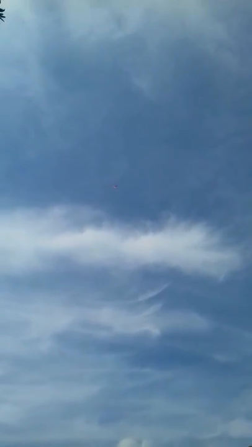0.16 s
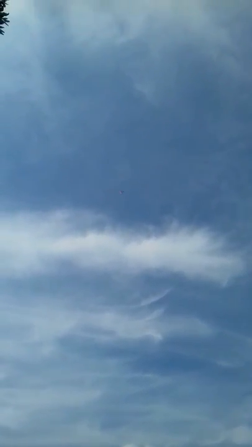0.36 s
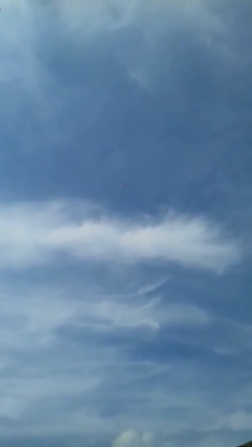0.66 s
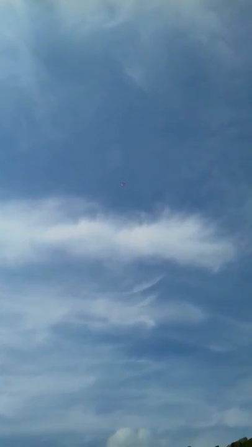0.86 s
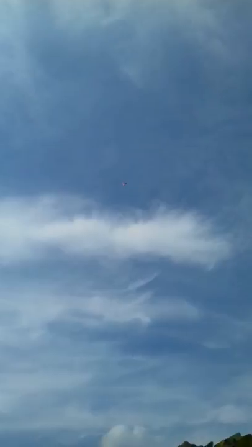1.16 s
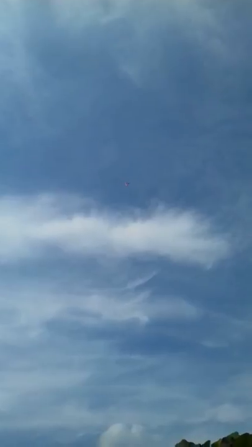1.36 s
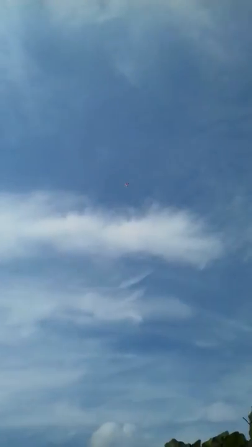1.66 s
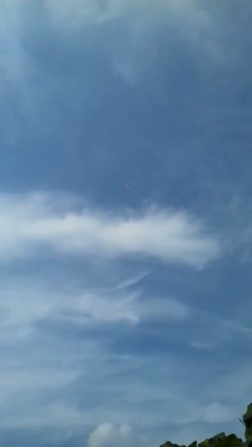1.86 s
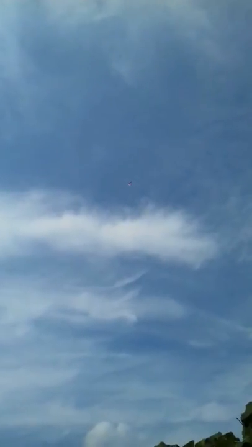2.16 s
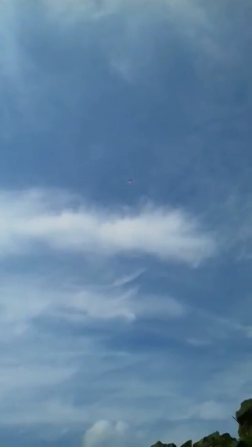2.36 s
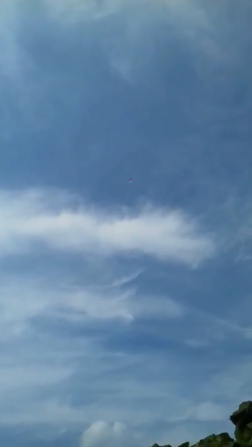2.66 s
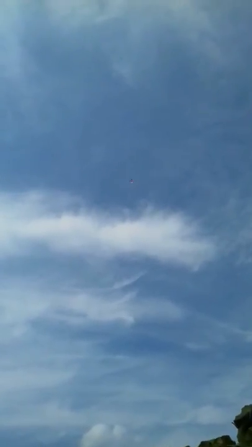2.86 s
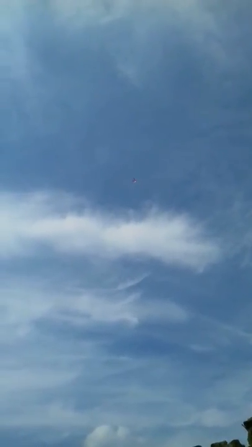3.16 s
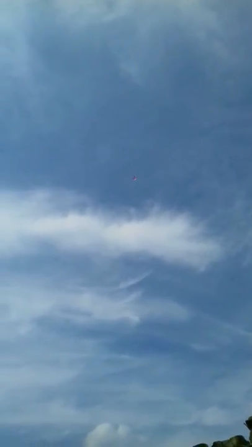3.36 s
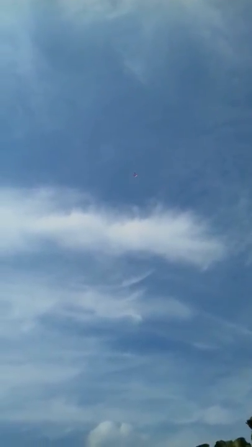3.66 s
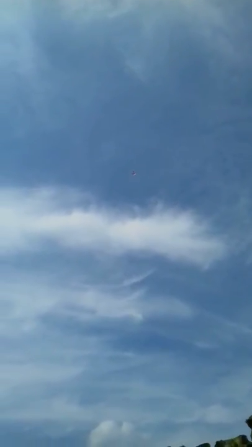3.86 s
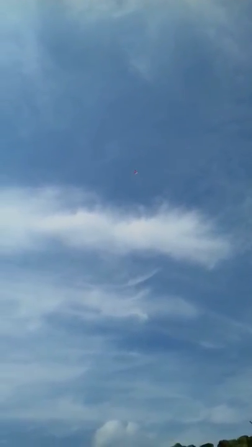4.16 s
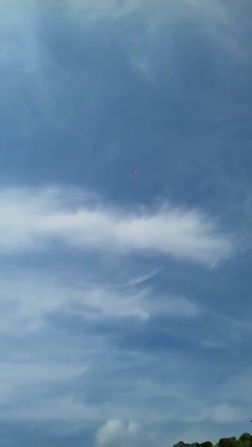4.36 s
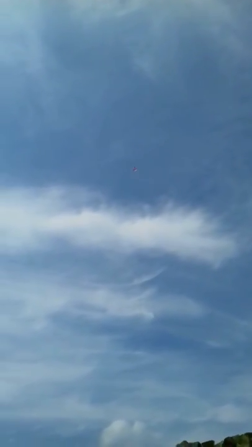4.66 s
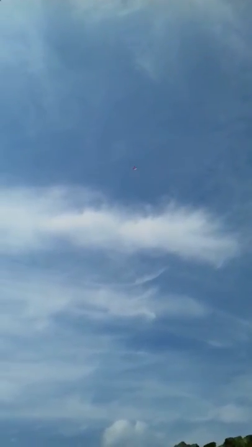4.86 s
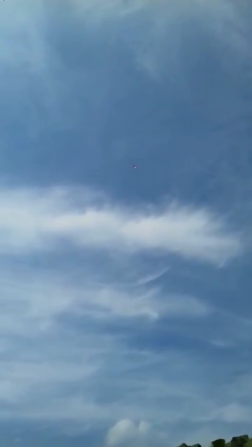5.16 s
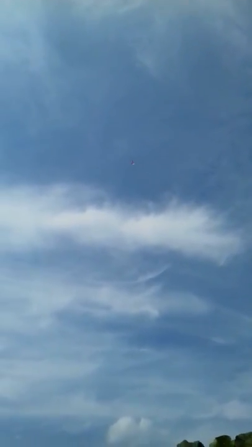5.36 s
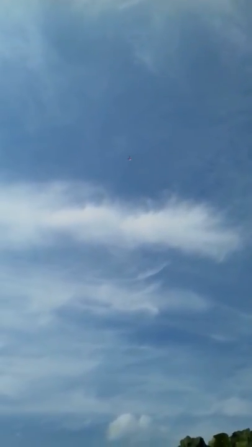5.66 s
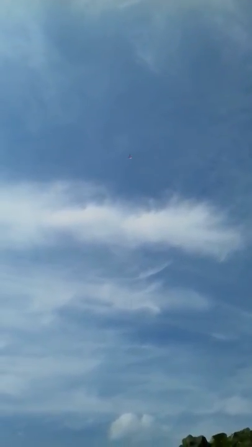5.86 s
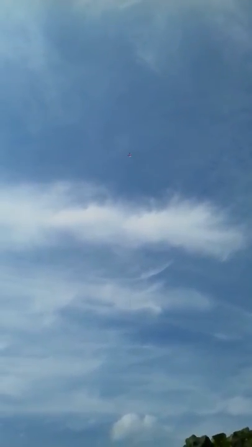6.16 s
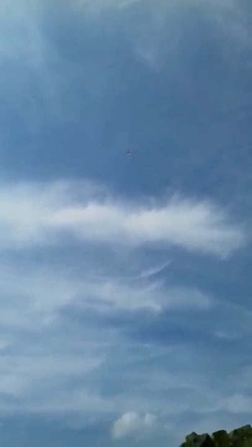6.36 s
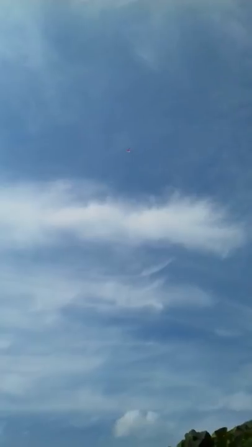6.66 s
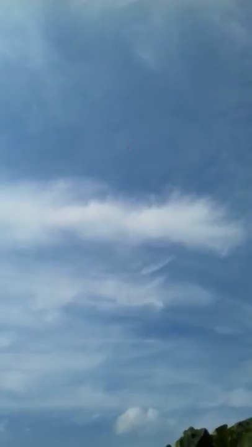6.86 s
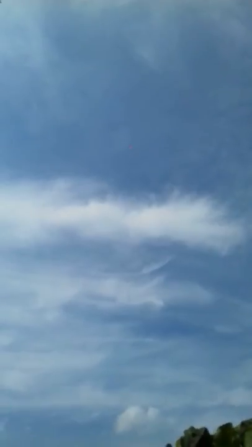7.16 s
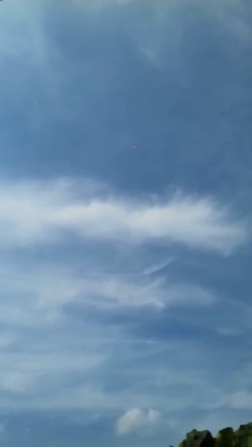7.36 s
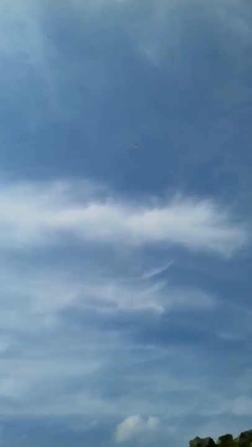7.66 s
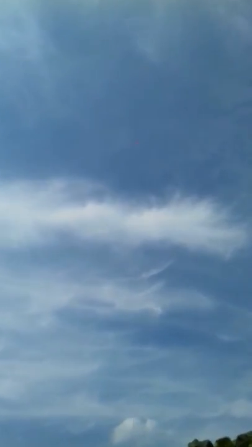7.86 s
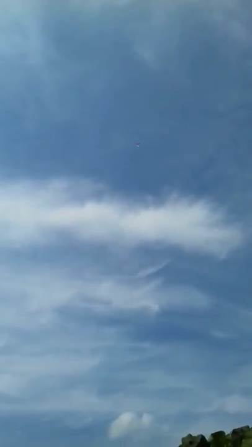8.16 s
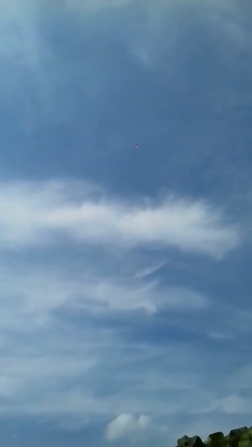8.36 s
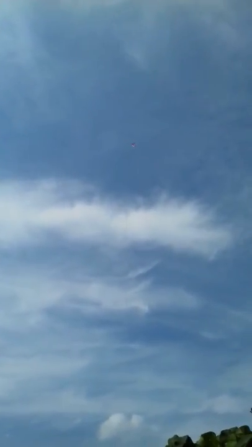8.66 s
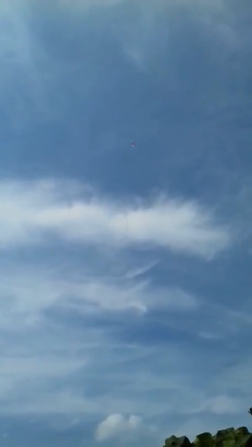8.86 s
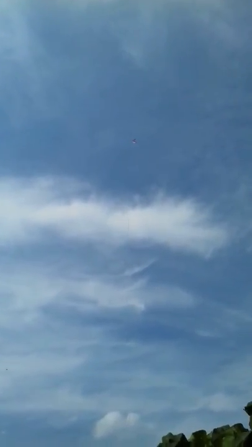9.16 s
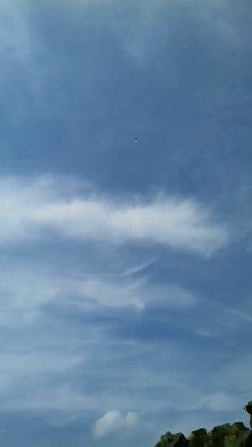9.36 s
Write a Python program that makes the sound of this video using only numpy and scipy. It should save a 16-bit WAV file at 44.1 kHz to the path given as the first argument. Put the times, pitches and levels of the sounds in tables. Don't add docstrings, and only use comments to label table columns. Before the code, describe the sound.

Throughout about 9.5 seconds, a kite hums high overhead: a thin, nasal buzz centred around 630 to 700 Hz, throbbing roughly nine times a second with a slight pitch wobble. From 1 to 1.8 s gusts make the bow sing out higher, near 840 Hz; the hum dips at 2.1 s, returns, and sings again near 2.5, 3.6 and 4.5 to 5.2 s. It drops briefly near 5.4 s, then from 6 to 7 s becomes almost steady before throbbing again, swelling at the end. Leaves hiss softly with dry ticks, sharpest at 1.87 and 4.08 s. Birds chirp briefly at 0.2, 0.7, 3.3, 3.6, 5, 6, 7.4, 7.9, 8.2 and 8.7 s. A faint far whine rises until 1.5 s and returns around 3 s; a low drone swells faintly. Small wind bumps occur at 4.5 and 9.1 to 9.3 s, over steady microphone hiss.

```python
import sys
import numpy as np
from scipy import signal
from scipy.fft import rfft, irfft, next_fast_len
from scipy.io import wavfile

SR = 44100
rng = np.random.default_rng(int(sys.argv[2]) if len(sys.argv) > 2 else 0)


def invert_db(x):
    u = np.asarray(x, float) / 20
    return 10 ** u


def transcribe(u):
    v = np.clip(np.atleast_2d(u).T, -1, 1)
    q = np.round(v * 32767).astype(np.int16)
    wavfile.write(sys.argv[1], SR, q)


N = 419082


def unit(x):
    return x / np.sqrt(np.mean(x ** 2) + 1e-20)


def in_time(rows):
    s, *columns = np.transpose(rows)
    return [np.interp(np.arange(N) / SR, s, column) for column in columns]


def drift(rate):
    r = np.exp(-80 * np.pi * rate / SR)
    slow = signal.lfilter([1], [1, -2 * r, r * r], rng.standard_normal(N // 40 + 2002))[2000:]
    return np.interp(np.arange(N) / 40, np.arange(len(slow)), unit(slow))


def resonance(x, hz, width_hz):
    r = np.exp(-np.pi * width_hz / SR)
    ring = [1, -2 * r * np.cos(2 * np.pi * hz / SR), r * r]
    return signal.lfilter([(1 - r * r) / 2, 0, (r * r - 1) / 2], ring, x)


def coloured(spectrum, patchy_db):
    size = next_fast_len(N)
    hz_at, db_at = np.transpose(spectrum)
    octave = np.log2(np.arange(size // 2 + 1) * SR / size + 1)
    curve_db = np.interp(octave, np.log2(hz_at), db_at, -120, -120)
    shaped = rfft(rng.standard_normal(size)) * invert_db(curve_db)
    if not patchy_db:
        return unit(irfft(shaped, size)[:N])
    out = 0
    together = drift(16.4)
    for centre in range(int(np.log2(hz_at[0])), 15):
        share = np.clip(1 - np.abs(octave - centre), 0, 1)
        flicker_db = patchy_db * (0.74 * together + drift(47))
        out = out + irfft(shaped * share, size)[:N] * invert_db(flicker_db)
    return unit(out)


def sine(turns):
    return np.sqrt(2) * np.sin(2 * np.pi * turns)


def kite():
    # time in seconds, hum level in dB, rocking from 0 to 1,
    # ribbon tautness as the centre of its tone in Hz.
    flight = [(0, -54.5, 0.99, 650), (.5, -58.5, 0.84, 645), (1.75, -50, 0.92, 635),
              (2.12, -66.5, 0.79, 570), (2.36, -52, 0.86, 653), (3.1, -58.5, 0.59, 630),
              (3.36, -54, 0.66, 651.4), (4.4, -57, 0.8, 657), (4.55, -57, .75, 662),
              (5.17, -55.5, 0.78, 640), (5.37, -68, 0.9, 650), (5.5, -56.5, 0.73, 641),
              (5.95, -53.5, 0.11, 656.4), (7.07, -53, .25, 656), (7.35, -57.5, 0.83, 640),
              (8.2, -55.5, .7, 707), (8.68, -64, .6, 660), (9.5, -49.5, .9, 670)]
    # top of the throb in seconds, accent in dB.
    rock_marks = [(.009, -3), (.222, 3), (.469, 4.5), (.553, -5), (.805, 6), (.912, -1), (1.781, -0.5),
                  (2.356, 0), (2.478, -1), (2.893, 1), (3.315, 2), (3.423, 2.5), (3.56, -1.5),
                  (3.771, -1.5), (4.036, 0), (4.143, 4), (4.297, 2.5), (4.531, -4), (4.831, -2.5),
                  (5.263, 3), (6.599, 0.5), (7.222, 2), (7.476, -0.5), (7.603, 5), (8.202, -1), (8.821, 6),
                  (8.975, 3.5), (9.222, 0), (9.327, 0), (9.479, -2)]
    rock_period_s, accent_reach_s, swell_db = .108, 0.12, 2.5
    flutter_base_hz, sharper_hz = 57.34, .7
    dip_db, pitch_bend, pitch_lead, jitter = 14, .014, .12, .003

    t = np.arange(N) / SR
    steps = t[::100]
    mark_s = np.array(rock_marks)[:, 0]
    rocks = np.cumsum(np.r_[0, np.maximum(np.round(np.diff(mark_s) / rock_period_s), 1)])
    turn = 2 * np.pi * np.interp(t, mark_s, rocks)
    hum_db, rocking, taut_hz = in_time(flight)
    accents = sum(db * np.clip(1.5 - np.abs(steps - at) / accent_reach_s, 0, 1) for at, db in rock_marks)
    hum_db = hum_db + swell_db * rocking * drift(4.2) + np.interp(t, steps, accents)
    throb = invert_db(-dip_db * rocking * (1 - np.cos(turn)) / 2)

    flutter_hz = flutter_base_hz + sharper_hz * rocking * (1 + 0.797 * drift(3.97))
    bend = pitch_bend * (np.cos(turn + 2 * np.pi * pitch_lead) - .5)
    cycles = np.cumsum(flutter_hz * (1 + rocking * (bend + jitter * drift(7.5)))) / SR

    bow_db = np.interp(t, steps, gusts(steps))
    bright_hz = taut_hz + 3.5 * (bow_db + 81.5)
    moving = invert_db(hum_db - 1.9) * ribbon(cycles, bright_hz, rocking) + invert_db(bow_db) * bow()
    return throb * moving + steady_hum(flutter_base_hz)


def ribbon(cycles, bright_hz, rocking):
    # multiple of the flutter pitch, level in dB.
    overtones = [(8, -22), (9, -18), (10, -12), (11, 0), (12, -2.5), (13, -9), (14, -17), (15, -22)]
    shift = (bright_hz - 660) / 70 + .3 * rocking ** 2 + .25 * rocking ** 2 * drift(8)
    total, power = 0, 0
    for multiple, _ in overtones:
        level_db = np.interp(multiple - shift, *np.transpose(overtones))
        height = invert_db(level_db + (.8 + 1.2 * rocking) * drift(9))
        total = total + height * sine(multiple * cycles)
        power = power + height ** 2
    return total / np.sqrt(power)


def bow():
    # pitch in Hz, level in dB.
    bow_modes = [(843, 3), (765, -6.5), (456, -11)]
    out = 0
    for hz, db in bow_modes:
        cycles = np.cumsum(hz * (1 + .009 * drift(14))) / SR
        out = out + invert_db(db + 1.5 * drift(7)) * sine(cycles)
    return out


def steady_hum(flutter_hz):
    # multiple of the flutter pitch, rms level in dB.
    low_tones = [(1, -77), (3, -85)]
    t = np.arange(N) / SR
    return sum(invert_db(db + 1.3 * drift(7.7)) * sine(multiple * flutter_hz * t) for multiple, db in low_tones)


def gusts(t):
    # peak in seconds, bow level in dB, release in dB per second.
    gust_rows = [(.42, -66.5, 25), (1.03, -61, 56), (1.38, -64, 88), (1.48, -56.5, 128), (1.66, -56, 74),
                 (2.49, -59.5, 130), (2.72, -64.5, 25), (3.55, -61.5, 80), (3.78, -61.5, 204),
                 (4.52, -61, 23), (5.16, -61.5, 9), (6.4, -73, 90), (7.22, -66.5, 153), (7.72, -67, 27),
                 (8.39, -64, 66), (8.89, -64.5, 150), (9.5, -73, 92)]
    calm_db, rise_db_per_s = -81.5, 115
    lull_start_s, lull_end_s = 5.28, 6.3
    out = np.full(len(t), calm_db)
    for s, db, release in gust_rows:
        below_peak = np.maximum((s - t) * rise_db_per_s, (t - s) * release)
        out = np.maximum(out, db - below_peak)
    lull_db = np.clip(t - lull_start_s, 0, None) * (t < lull_end_s) * rise_db_per_s
    return np.maximum(out - lull_db, calm_db)


def ticks():
    # start in seconds, peak level in dB, pitch in Hz, length in seconds.
    tick_rows = [(0.406, -45, 4500, 0.007), (0.476, -41, 4050, 0.007), (0.668, -43, 4050, 0.0084),
                 (1.161, -38, 4400, 0.0085), (1.458, -44, 4500, 0.007), (1.483, -38, 4500, 0.007),
                 (1.65, -44, 4620, 0.0052), (1.747, -47, 4240, 0.012), (1.8677, -27, 4320, 0.0063),
                 (1.998, -40.5, 4220, 0.0063), (2.725, -43, 3900, 0.0064), (3.519, -37, 4300, 0.0093),
                 (3.919, -42, 4297, 0.013), (4.077, -32, 3980, 0.0072), (4.472, -40, 3930, 0.0084),
                 (4.489, -38, 4170, 0.0082), (5.447, -37, 4040, 0.0047), (5.528, -40.5, 4570, 0.0072),
                 (6.448, -43, 4180, 0.0061), (6.502, -42, 4570, 0.0079), (6.628, -36.5, 4100, 0.0061),
                 (8.161, -63, 4526, 0.0069), (9.0172, -42.5, 4460, 0.0089), (9.046, -39, 4340, 0.011),
                 (9.06, -44, 4200, 0.014), (9.14, -43, 4453, 0.0084)]
    # start in seconds, peak level in dB, pitch in Hz, length in seconds.
    scuff_rows = [
        (1.525, -47, 2714, .008),
        (1.663, -43, 2900, 0.0092),
        (1.748, -43, 2700, 0.0065),
        (2.85, -49, 2960, .008),
        (4.068, -41, 3120, 0.015),
        (4.218, -47, 1603, 0.01234),
        (6.821, -41, 3500, 0.0072),
        (7.675, -44.5, 2580, 0.01),
        (8.344, -37, 3100, 0.01),
    ]
    out = np.zeros(N)
    t = np.arange(1500) / SR
    for s, db, hz, length in [*tick_rows, *scuff_rows]:
        burst = rng.standard_normal(len(t)) * t / length * np.exp(-(t / length) ** 2 * 2)
        ring = resonance(resonance(resonance(burst, hz, hz / 3), hz, hz / 2), hz, hz / 1.5)
        crack = resonance(resonance(burst, 6000, 2500), 6500, 3000)
        tick = ring + .012 * crack
        at = round((s - .001) * SR)
        out[at:at + len(t)] += invert_db(db) * tick / np.abs(tick).max()
    return out


def shaped_calls(rows, shape):
    return [[(start + length * share, hz * (1 + depth * change), db + loss) for share, change, loss in shape]
            for start, length, hz, db, depth in rows]


def birds():
    # start in seconds, length in seconds, pitch in Hz, rms level in dB,
    # depth of the pitch shape.
    chirp_rows = [
        (.734, .045, 3600, -48.5, .3),
        (3.334, .073, 3700, -43.5, .6),
        (4.951, .06, 3700, -43.5, .8),
        (5.996, .075, 3760, -44, .4),
        (7.408, .06, 3750, -45.5, .6),
        (7.9, .093, 3790, -48, 1.4),
        (8.239, .07, 3700, -42, 1.7),
    ]
    arch_rows = [
        (3.6, .055, 4060, -46, .3),
        (5.055, .095, 4280, -47.5, 1),
        (8.715, .1, 4300, -46, 1),
    ]
    # start in seconds, length in seconds, start pitch in Hz, end pitch in Hz, rms level in dB.
    far_rows = [(.163, .022, 3750, 3050, -51), (.185, .05, 4600, 4000, -53), (.238, .018, 3800, 3250, -50),
                (.255, .02, 2900, 2500, -59), (6.585, .02, 2700, 2350, -54), (7.135, .04, 3630, 3620, -56),
                (7.2, .06, 3630, 3620, -57), (7.215, .035, 7600, 6800, -71), (7.34, .11, 3200, 2680, -62),
                (7.88, .14, 3050, 2570, -63), (7.95, .04, 4950, 4800, -52), (7.99, .05, 3550, 3400, -59),
                (8.255, .02, 4950, 4800, -51)]
    # share of its length, pitch change as a share, level in dB.
    chirp_shape = [(0, -.02, -12), (.22, 0, -1), (.45, -.008, -1), (.85, -.038, -5), (1, -.046, -14)]
    arch_shape = [(0, -.07, -16), (.2, -.025, -2), (.5, 0, 0), (.88, -.06, -3), (1, -.08, -14)]
    half_way, ends_db = .42, -5
    edge_s = 0.0013

    far = []
    for start, length, hz0, hz1, db in far_rows:
        middle_hz = hz0 + half_way * (hz1 - hz0)
        far.append([(start, hz0, db + ends_db), (start + length / 2, middle_hz, db),
                    (start + length, hz1, db + ends_db)])
    chirps = shaped_calls(chirp_rows, chirp_shape)
    arches = shaped_calls(arch_rows, arch_shape)

    out = np.zeros(N)
    hoarse, waver = drift(120), drift(190)
    # its calls, level flutter in dB, pitch waver as a share
    for calls, flutter_db, spread in ((chirps, 2.5, .011), (arches, 1.2, .002), (far, 3, .016)):
        for call in calls:
            s, hz, db = np.transpose(call)
            i = np.arange(round(s[0] * SR), round(s[-1] * SR))
            edge = np.clip(np.minimum(i - i[0], i[-1] - i) / (edge_s * SR), 0, 1)
            turns = np.cumsum(np.interp(i / SR, s, hz) * (1 + spread * waver[i])) / SR
            level = invert_db(np.interp(i / SR, s, db) + flutter_db * hoarse[i])
            out[i] += edge * level * sine(turns)
    trees = rng.standard_normal(6000) * np.exp(-np.arange(6000) / SR / .03)
    echoes = signal.fftconvolve(out, trees / np.sqrt(np.sum(trees ** 2)))[:N]
    return out + invert_db(-13) * echoes


def leaves():
    # frequency in Hz, level in dB per Hz.
    leaf_spectrum = [(600, -49), (1000, -9.5), (3000, -10), (4500, 0.5), (6000, -18.5), (7000, -25.5),
                     (12000, -35.5), (15800, -37)]
    air_spectrum = [(25, -28), (40, -32), (60, -3.5), (150, -4.5), (400, -3), (700, 6), (1000, -4.5),
                    (1500, -18.5)]
    # time in seconds, rustle level in dB.
    breeze = [(0, -52.5), (.9, -52.5), (1.32, -51), (1.48, -52.5), (1.75, -51), (2.0, -53.5), (2.7, -52.5),
              (3.09, -53.5), (3.5, -52), (4.4, -52), (4.73, -53.5), (5.18, -51.5), (5.32, -54),
              (6.6, -52.5), (7.3, -54.5), (8.15, -51.5), (8.4, -54.5), (9.5, -53.5)]
    peak_hz, width_hz = 4440, 1100
    cracks_per_s, crackle_db = 300, -12
    air_start_db, air_sag_db_per_s, air_follows = -59, 0.24, 0.4

    rustle_db, = in_time(breeze)
    crack_size = invert_db(3.5 * np.minimum(rng.exponential(1, N), 3)) * rng.choice([-1, 1], N)
    cracks = (rng.random(N) < cracks_per_s / SR) * crack_size
    crackle = unit(resonance(resonance(cracks, peak_hz, width_hz), peak_hz, width_hz))
    rustle = coloured(leaf_spectrum, patchy_db=1.09) + invert_db(crackle_db) * crackle
    air_db = air_start_db - air_sag_db_per_s * np.arange(N) / SR
    air_db = air_db + air_follows * (rustle_db - rustle_db.mean())
    return invert_db(rustle_db + 2.0) * rustle + invert_db(air_db) * coloured(air_spectrum, patchy_db=1.05)


def wind():
    # middle in seconds, length in seconds, peak level in dB, pitch in Hz.
    puffs = [
        (1.45, 0.031, -58, 78),
        (4.516, 0.0085, -46, 132.3),
        (9.076, 0.033, -61, 97.6),
        (9.263, 0.017, -53, 108.8),
        (9.322, 0.07, -63.5, 91.3),
    ]
    t = np.arange(N) / SR
    out = np.zeros(N)
    for s, length, db, hz in puffs:
        swell = np.exp(-(2 * (t - s) / length) ** 2)
        out += invert_db(db) * swell * np.sin(2 * np.pi * hz * (s - t) + 0.42)
    return out


def whine():
    # time in seconds, pitch in Hz, rms level in dB.
    glide = [
        (0, 1620, -68),
        (.6, 1730, -66.5),
        (1.1, 1830, -68),
        (1.5, 1900, -75),
        (2.85, 1920, -76),
        (3.1, 1890, -67.5),
        (3.4, 1870, -74),
        (3.7, 1860, -95),
    ]
    hz, db = in_time(glide)
    cycles = np.cumsum(hz * (1 + .022 * drift(50))) / SR
    return invert_db(db + .5 + 2.5 * drift(30)) * sine(cycles)


def drone():
    # middle in seconds, half length in seconds, level in dB.
    swells = [
        (.05, .15, -78),
        (.95, 0.12, -73),
        (1.588, 0.37, -68.5),
        (2.6, 0.54, -75),
        (3.547, 0.18, -69.5),
        (5.55, .1, -80),
        (6.3, 0.36, -78.5),
        (7.25, .12, -75),
        (8.149, 0.16, -79),
    ]
    t = np.arange(N) / SR
    level = sum(invert_db(db) * np.exp(-((t - s) / half) ** 2) for s, half, db in swells)
    return level * unit(resonance(resonance(rng.standard_normal(N), 188, 50), 188, 50))


def scene():
    mix = kite() + ticks() + birds() + leaves() + wind() + whine() + drone()
    return np.tile(mix, (2, 1))


def low_pass(x):
    return signal.sosfilt(signal.butter(12, 15740, fs=SR, output="sos"), x)


def record(dry):
    # frequency in Hz, level in dB per Hz.
    self_noise = [(25, -50), (40, -19), (106, -6.5), (950, 3.5), (3000, -1), (5300, -4.5), (9000, -8.5),
                  (16000, -10.5)]
    hiss_db, offset = -65.5, -0.00067
    hiss = np.array([coloured(self_noise, patchy_db=0) for channel in dry])
    return low_pass(dry + invert_db(hiss_db) * hiss + offset)


dry = scene()
out = record(dry)
transcribe(out)
```